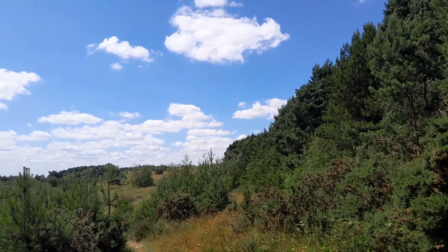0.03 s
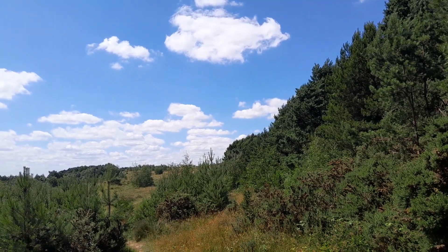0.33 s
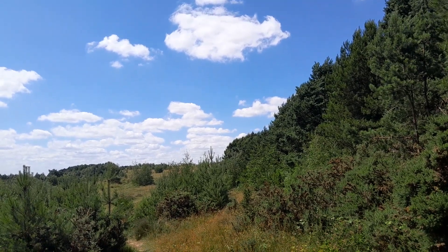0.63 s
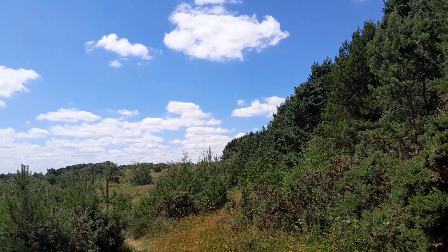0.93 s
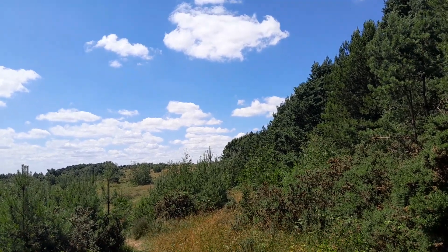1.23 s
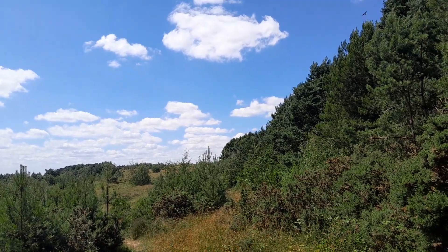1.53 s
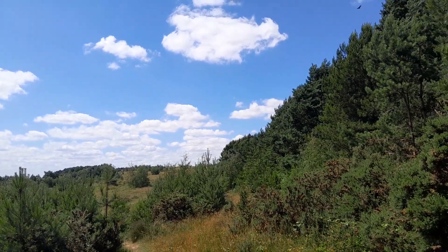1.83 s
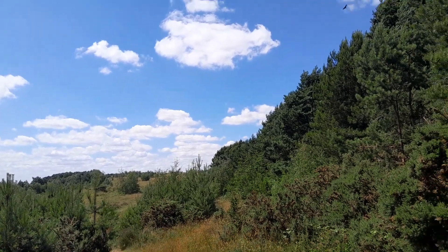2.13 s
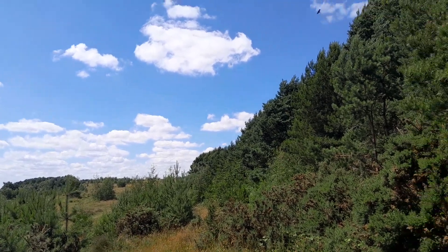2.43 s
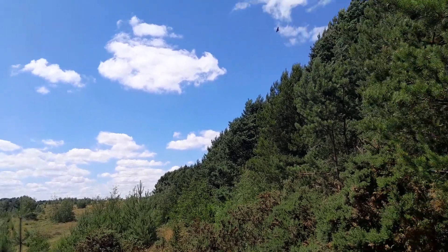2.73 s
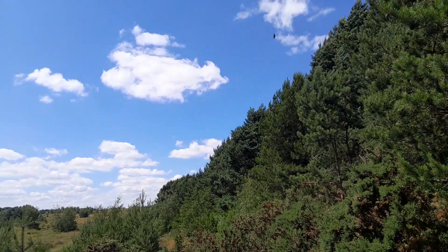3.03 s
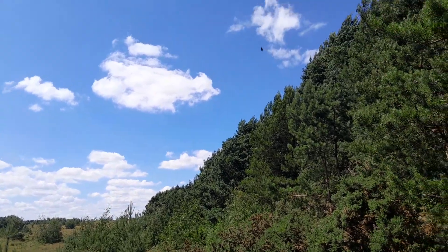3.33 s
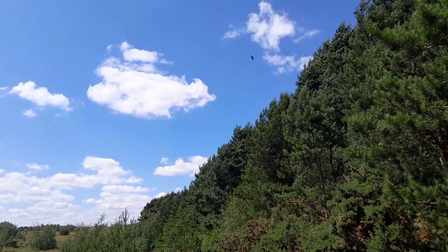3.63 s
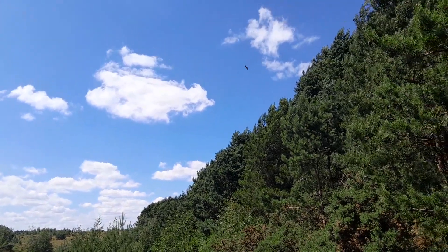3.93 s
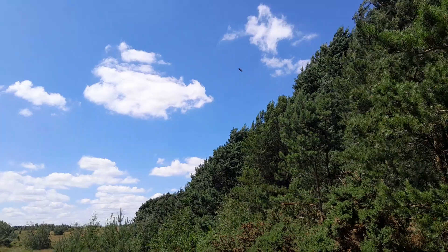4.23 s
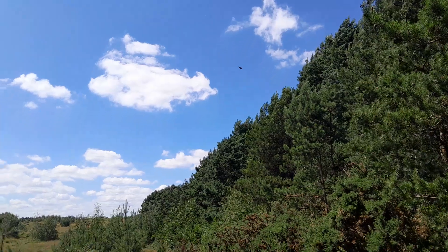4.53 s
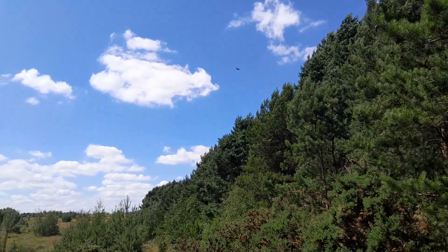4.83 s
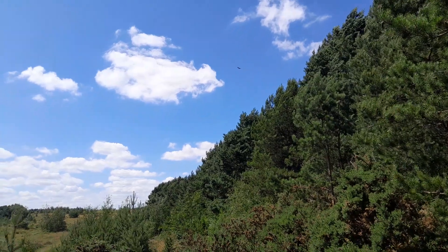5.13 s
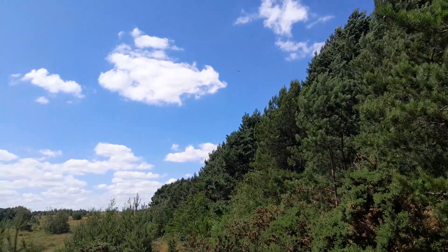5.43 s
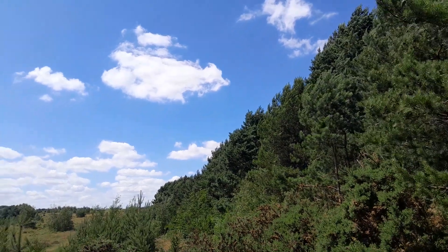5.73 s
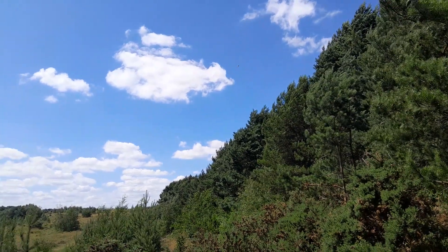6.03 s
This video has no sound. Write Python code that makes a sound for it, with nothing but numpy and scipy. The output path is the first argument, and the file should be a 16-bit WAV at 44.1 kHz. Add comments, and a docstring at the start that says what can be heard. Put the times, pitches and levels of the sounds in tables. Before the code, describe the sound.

Low, uneven wind buffeting outdoors, with faint short bird calls and a few sharp little snaps between the gusts.

```python
"""Summer heathland at the edge of a pine wood, heard from a hand-held camera with two microphone ports.
Far off, wind roars over the woods; nearer, it hisses in the needles. Grasshoppers rasp on the left,
a few small birds call, gorse pods snap open in the heat, and the wall of trees echoes birds and pods.
Right at the microphone, gusts buffet the ports: turbulence rumbles and flutters, large eddies thump,
the flow tears off the housing, and the cavity of the left port hums."""
import sys
import numpy as np
from scipy import signal
from scipy.fft import rfft, irfft, next_fast_len
from scipy.io import wavfile
from scipy.ndimage import uniform_filter1d, map_coordinates

SR = 44100
rng = np.random.default_rng(int(sys.argv[2]) if len(sys.argv) > 2 else 0)


def pcm_store(signal):
    """Save signal as 16-bit PCM."""
    levels = np.round(np.clip(np.atleast_2d(signal), -1, 1) * 32767)
    wavfile.write(sys.argv[1], SR, levels.astype(np.int16).T)


N = 272097


def amp(db):
    """Decibels to gain."""
    return 10 ** (np.asarray(db) / 20)


def unit(x):
    """Each channel at rms 1."""
    return x / np.sqrt(np.mean(x ** 2, axis=-1, keepdims=True) + 1e-20)


def along(points, hz):
    """Rows of f/Hz, value, read on a log frequency axis."""
    freqs, values = np.transpose(points)
    return np.interp(np.log(hz + 1), np.log(freqs + 1), values)


def curve(rows):
    """Rows of t/s, value, as one value per sample."""
    return np.interp(np.arange(N) / SR, *np.transpose(rows))


def wobble(rate):
    """A smooth random curve, rate knots a second."""
    knots = rng.standard_normal(int(N * rate / SR) + 4)
    return map_coordinates(knots, [np.arange(N) * rate / SR])


def filtered(x, response):
    """x through a frequency response."""
    size = next_fast_len(N + SR // 2)
    return irfft(rfft(x, size) * response(np.fft.rfftfreq(size, 1 / SR)), size)[..., :N]


def noise(spectrum):
    """Noise of rms 1, coloured by rows of f/Hz, level/dB."""
    return unit(filtered(rng.standard_normal(N), lambda hz: amp(along(spectrum, hz))))


def even(x, size):
    """x with its own swells over size samples levelled out."""
    power = uniform_filter1d(uniform_filter1d(x * x, size), size)
    return x / np.sqrt(np.abs(power) + 1e-9)


def pan(db):
    """Left and right gains for a level difference."""
    return amp([[db / 2], [-db / 2]])


def add(track, s, sound):
    """Mix a sound in at time s."""
    at = round(s * SR)
    lo, hi = max(at, 0), min(at + sound.shape[-1], N)
    track[..., lo:hi] += sound[..., lo - at:hi - at]


def roar(gain_db=7.0, lag_s=0.00039):
    """Far wind over the woods, reaching the left port first and the right one a moment later."""
    # colour of the roar: f/Hz, level/dB
    spectrum = [(40, -18), (200, -3.5), (380, -1.5), (580, -2.5), (900, 3), (1100, 1), (1500, -7),
                (1900, -16.5), (2400, -40), (4000, -28), (8000, -120)]
    # sound arriving from one direction: f/Hz, share of the power
    one_way = [(200, 0.64), (550, 0.25), (1000, 0.82), (1400, 0.56), (2200, 0.63)]
    # rise and fall of the far wind: t/s, level/dB
    swell = [(0.0, -56), (0.43, -62.5), (0.95, -63.5), (1.55, -63), (2.08, -61.5), (2.54, -58), (2.68, -65),
             (2.84, -70.5), (3.04, -64.5), (3.17, -74), (3.47, -69.5), (4.02, -67.5), (4.26, -61.5),
             (4.42, -67), (4.73, -62), (5.09, -65), (5.43, -61), (6.17, -66)]
    far, diffuse = noise(spectrum), np.array([noise(spectrum), noise(spectrum)])
    delay = lambda hz: np.exp(-2j * np.pi * np.outer([0, lag_s], hz))
    direct = filtered(far, lambda hz: np.sqrt(along(one_way, hz)) * delay(hz))
    scattered = filtered(diffuse, lambda hz: np.sqrt(1 - along(one_way, hz)))
    return amp(curve(swell) + gain_db + .9 * wobble(12)) * (direct + scattered)


def hollow_tone(peak_s=0.066, half_s=0.2, hz=860, width_hz=45, level_db=-59):
    """A faint hollow tone rings briefly in the far roar."""
    t = np.arange(N) / SR
    ring = unit(filtered(rng.standard_normal((2, N)), lambda f: np.exp(-((f - hz) / width_hz) ** 2)))
    return amp(level_db) * np.exp(-((t - peak_s) / half_s) ** 2) * ring


def tree_echo(x, build_s=0.01):
    """Trunks and needles at the wood's edge scatter sound back as a short diffuse tail."""
    # decay of the echo: f/Hz, t60/s
    decay = [(500, 0.43), (4700, 0.33), (9000, 0.26), (15000, 0.62)]
    hz, t, bands = signal.stft(rng.standard_normal((2, SR // 2)), SR, nperseg=256)
    envelope = amp(-60 * t / along(decay, hz)[:, None]) * (1 - np.exp(-t / build_s))
    tail = signal.istft(bands * envelope, SR, nperseg=256)[1]
    return signal.fftconvolve(x, tail / np.linalg.norm(tail[0]), axes=1)[:, :N]


def needles(gain_db=-4):
    """Wind hisses in the near pines; the left port hears more of the middle of the hiss."""
    # colour of the hiss: f/Hz, level/dB
    spectrum = [(800, -20), (1600, 11.5), (2100, 9), (2500, -1), (3200, -7), (4000, -7.5), (5200, -2.5),
                (6200, -3), (7400, 2.5), (8300, -2), (9300, -8.5), (10500, -5.5), (12000, -2.5),
                (15800, -6)]
    # wind in the near trees: t/s, level/dB
    swell = [(0, -66), (0.7, -71), (2.1, -67.5), (2.42, -65), (2.8, -71), (3.6, -70), (4.25, -64),
             (4.6, -66), (5.4, -62.5), (6.17, -61)]
    left_lift = [(2000, -2), (4500, 7), (8000, 7), (10000, -1), (15000, -1)]  # f/Hz, gain/dB
    left = filtered(noise(spectrum), lambda hz: amp(along(left_lift, hz)))
    return amp(curve(swell) + gain_db + .4 * wobble(15)) * np.array([left, noise(spectrum)])


def grasshoppers(gain_db=-6, fade_s=.08, low_from_s=3.366):
    """Bouts of very high rasping in the grass to the left, pulsed by uneven wing strokes."""
    # bouts of rasping: start/s, end/s, level/dB, stroke rate/Hz, stroke depth/dB
    bouts = [(-0.1, 0.913, -73, 36, -4), (0.925, 1.4, -72, 36, 0.2), (2.051, 2.532, -70, 32, 0),
             (3.366, 3.42, -76, 30, 3), (4.161, 4.43, -77, 24, 3.5), (4.762, 5.22, -77.5, 60, 6),
             (5.842, 6.13, -71, 27, 5.5)]
    # voice of the first singers: f/Hz, level/dB
    high_rasp = [(6000, -49), (10000, -15.5), (11500, -15.5), (12600, -13.5), (13300, -4.5), (14600, -3),
                 (15800, 0), (17000, -11)]
    # lower voice of the later singers: f/Hz, level/dB
    low_rasp = [(7000, -47), (10200, -27), (11300, -7.5), (12200, 3.5), (13300, -8.5), (14700, 3.5),
                (15800, -3), (17000, -22)]
    t, envelope = np.arange(N) / SR, np.zeros(N)
    drift, uneven_db = .5 * wobble(25), wobble(60)
    for start, end, db, rate, depth_db in bouts:
        gate = np.clip(np.minimum(t - start, end - t) / fade_s + .5, 0, 1)
        envelope += gate * amp(db + depth_db * np.sin(2 * np.pi * (rate * t + drift)))
    voice = np.where(t < low_from_s, noise(high_rasp), noise(low_rasp))
    return envelope * amp(gain_db + uneven_db) * voice * pan(20.5)


def branches(x, count=14, first_s=0.0038, spread_s=.02, gain_db=-12):
    """Nearby branches send each port a few close reflections that smear the sound."""
    out = x.copy()
    for port, (delay, strength) in zip([0, 1] * count, rng.random((2 * count, 2))):
        add(out[port], first_s + delay * spread_s, amp(gain_db) * (.5 + strength) * x[port])
    return out * np.sqrt(np.sum(x ** 2) / np.sum(out ** 2))


def bird_note(hz, waver_hz):
    """One note on a pitch path, swelling and fading; a fast random waver makes it buzz."""
    pitch = hz + waver_hz * wobble(500)[:len(hz)]
    envelope = np.sqrt(np.abs(np.sin(np.linspace(0, np.pi, len(hz)))))
    return envelope * np.sin(2 * np.pi * np.cumsum(pitch) / SR)


def birds(chip_start_hz=8280, chip_bend=1.9, slide_share=0.09, slide_s=.028):
    """Small birds out in the gorse: buzzy notes, falling chips and rising whistles."""
    # buzzy notes: t/s, length/s, f/Hz, fall/Hz, level/dB, waver/Hz, left-right/dB
    buzzes = [(-0.03, 0.077, 4040, 79.5, -50, 110, 4.5), (-0.03, 0.052, 5020, -5, -59, 170, 8.5),
              (0.079, 0.031, 2750, 801.5, -55.5, 220, 3.5), (0.155, .115, 2785, 123, -59.5, 260, 2.5),
              (5.554, .22, 4530, 52, -74, 379, 14.5), (5.74, .5, 4510, 52.5, -74.5, 446, 16)]
    # chips that fall fastest at first: t/s, length/s, end f/Hz, level/dB
    chips = [(0.331, 0.013, 4200, -58), (0.357, .02, 3600, -51), (2.722, .04, 5500, -73),
             (3.282, .03, 6000, -71), (3.613, 0.015, 6500, -70)]
    # thin whistles that slide up and hold: t/s, length/s, held f/Hz, level/dB, left-right/dB
    whistles = [(2.458, .2, 4810, -67, 0), (2.854, .09, 4130, -85.5, -6), (2.991, 0.15, 4675, -71, -2),
                (3.346, .1, 4060, -79.5, -4)]
    out = np.zeros((2, N))
    for s, length, hz, fall_hz, db, waver_hz, pan_db in buzzes:
        path = hz + fall_hz * np.linspace(.5, -.5, int(length * SR))
        add(out, s, amp(db) * pan(pan_db) * bird_note(path, waver_hz))
    for s, length, end_hz, db in chips:
        path = end_hz + (chip_start_hz - end_hz) * np.linspace(1, 0, int(length * SR)) ** chip_bend
        add(out, s, amp(db) * pan(6) * bird_note(path, waver_hz=350))
    for s, length, hz, db, pan_db in whistles:
        path = hz * (1 - slide_share * np.exp(-np.arange(int(length * SR)) / SR / slide_s))
        add(out, s, amp(db) * pan(pan_db) * bird_note(path, waver_hz=45))
    return out


def gorse_pods(gain_db=-5):
    """Dry pods, a little left of centre, split with a bright snap of a few milliseconds."""
    # pods splitting: t/s, level/dB, t60/s
    snaps = [(0.1424, -54, 0.0086), (0.791, -36, 0.0099), (0.886, -52.5, 0.0063), (1.548, -44.5, 0.0054),
             (1.7402, -39.5, 0.0057), (2.0257, -49.5, 0.0067), (3.6382, -53, .006)]
    # colour of a snap: f/Hz, level/dB
    spectrum = [(1000, -41), (3000, -9), (5000, -9.5), (7500, 4.5), (10000, 0.5), (12000, -0.5),
                (14500, 8.5), (16500, -11)]
    out, t = np.zeros((2, N)), np.arange(SR // 20) / SR
    colour = amp(along(spectrum, np.fft.rfftfreq(len(t), 1 / SR)))
    for s, db, t60 in snaps:
        crack = unit(irfft(rfft(rng.standard_normal((2, len(t)))) * colour, len(t)))
        add(out, s, crack * amp(db + gain_db - 60 * t / t60))
    return out * pan(2.7)


def air_flow(port, jitter_db=2, lull_below_db=-40, lull_depth=0.28):
    """Flow over one port (0 left, 1 right) in dB: a swell, more fitful when weak, with puffs on it."""
    # slow swell at the left port: t/s, level/dB
    left_swell = [(0.0, -25), (0.44, -55), (0.71, -41.5), (1.17, -69), (1.55, -63), (1.69, -40),
                  (2.22, -41), (2.39, -20), (2.66, -15), (2.71, -74), (3.3, -93), (4.26, -43), (4.54, -85),
                  (5.0, -38), (5.27, -54), (5.64, -26), (5.71, -46.5), (6.17, -34.5)]
    # slow swell at the right port: t/s, level/dB
    right_swell = [(0.0, -47), (0.14, -49), (0.89, -54.0), (1.94, -60), (2.36, -45), (2.52, -32.5),
                   (2.81, -55), (3.24, -49.5), (3.85, -38.5), (4.19, -27.0), (4.59, -49), (4.6, -30),
                   (5.11, -62.5), (5.16, -35.5), (5.49, -21), (5.71, -39), (5.92, -25.5), (6.17, -37)]
    # short puffs: t/s, half length/s, left level/dB, right level/dB
    puffs = [(0.073, 0.01, -42, -25), (0.366, 0.043, -41.5, -45), (0.721, 0.023, -34, -61.0),
             (0.76, 0.013, -54, -31.5), (1.013, 0.057, -35.0, -62), (1.269, 0.054, -50.0, -39),
             (1.384, 0.027, -34, -46), (1.458, 0.018, -50, -32.5), (1.608, 0.036, -59.0, -36),
             (1.756, 0.036, -31, -58), (1.875, 0.016, -31, -58.0), (2.016, 0.064, -31, -50),
             (2.115, 0.0092, -44, -31), (2.415, 0.021, -25, -30), (2.968, 0.072, -59, -39.5),
             (3.053, 0.044, -80, -42.0), (3.389, 0.011, -38.5, -37), (3.63, 0.061, -44.0, -41.0),
             (3.823, 0.013, -46, -39), (3.947, 0.016, -41, -49), (4.233, 0.032, -25.0, -34),
             (4.666, 0.034, -34.5, -35.5), (4.806, 0.029, -41, -33.5), (5.017, 0.043, -39, -35.5),
             (5.138, 0.019, -25.5, -24), (5.2, 0.021, -25, -23), (5.583, 0.011, -18, -24),
             (5.684, 0.013, -29, -24.5), (5.816, 0.013, -47, -34), (6.118, 0.012, -17.5, -18)]
    t, swell_db = np.arange(N) / SR, curve([left_swell, right_swell][port])
    unrest_db = jitter_db + lull_depth * np.clip(lull_below_db - swell_db, 0, 20)
    power = amp(swell_db + unrest_db * wobble(30)) ** 2
    for s, half_s, *db in puffs:
        power += amp(db[port]) ** 2 * np.exp(-2 * np.minimum(((t - s) / half_s) ** 2, 20))
    return 10 * np.log10(power)


def flutter(port):
    """Faster air sheds smaller eddies: their base level against the rumble at one port, in dB."""
    # flutter over rumble: t/s, left/dB, right/dB
    balance = [(0, -5, -12), (1, -21.5, -21), (2.1, -17.5, -4.5), (2.42, -4, -12), (2.65, 11.5, -12.5),
               (2.75, -9, -17.5), (3.6, 2, -1.5), (4.1, 3.5, 1.5), (4.65, -0.5, -4.5), (5.1, -1.5, 0),
               (5.43, 20, 1.5), (5.6, 0, 0.5), (5.9, 16.5, 13.5), (6.17, 11, 0)]
    return curve([(s, db[port]) for s, *db in balance])


def cavity_hum(flows_db, centre_hz=335, width_hz=150, follow=0.45, gain_db=-12.5):
    """Air grazing the left port sounds its broad, breathy resonance, which surges with each puff."""
    # strength of the hum: t/s, level/dB
    swell = [(0, -61), (0.6, -64), (2.2, -71), (2.6, -48), (2.71, -61.5), (3.04, -53), (3.25, -66),
             (3.55, -63.5), (4.1, -35), (4.25, -42), (4.5, -54.5), (5.05, -58), (5.35, -34), (5.55, -41),
             (5.75, -42.5), (5.95, -35), (6.17, -45)]
    resonance = lambda hz: (hz * width_hz / (centre_hz ** 2 - hz ** 2 + 1j * hz * width_hz)) ** 2
    hum = even(unit(filtered(rng.standard_normal(N), resonance)), size=1500)
    stronger_db = flows_db.max(axis=0)
    puff_db = stronger_db - uniform_filter1d(stronger_db, size=9000)
    return amp(curve(swell) + gain_db + follow * puff_db + 4.8 * wobble(25)) * hum * pan(13.4)


def tearing(flows_db, strong_gain_db=-2, weak_gain_db=-35, rough_db=4, ragged_db=5):
    """Flow tears off the housing in ragged rasps: a few strong ones, and weak ones in fast air."""
    # strong rasps at gust peaks: t/s, half length/s, level/dB, left-right/dB
    tears = [(2.549, 0.0038, -30.5, 17), (2.597, 0.017, -40, 19.5), (2.662, .004, -40, 13.5),
             (4.039, 0.0064, -38, -6), (4.116, 0.0052, -36.5, 7), (4.17, 0.0089, -42, -2),
             (4.21, 0.0045, -36.5, -10), (5.201, 0.023, -44.5, 6), (5.325, 0.0069, -37, 4),
             (5.382, 0.0048, -29.5, 10), (5.436, 0.023, -28.5, 0.5), (5.571, 0.0032, -35.5, 2),
             (5.636, 0.0046, -36, -11), (6.146, 0.044, -40.5, -1)]
    # colour of the smallest eddies: f/Hz, level/dB
    spectrum = [(150, -36), (300, -1), (480, 8.5), (660, -0.5), (850, -10.5), (1200, -22), (2000, -49),
                (4000, -120)]
    t = np.arange(N) / SR
    strong = sum(amp(db) * pan(pan_db) * np.exp(-((t - s) / half_s) ** 2)
                 for s, half_s, db, pan_db in tears)
    fast_db = np.minimum(flows_db, -24) + np.minimum([flutter(0), flutter(1)], 0)
    weak = amp(fast_db + weak_gain_db + ragged_db * np.array([wobble(90), wobble(90)]))
    rasp = np.array([even(noise(spectrum) * amp(rough_db * wobble(220)), size=500) for _ in range(2)])
    return (amp(strong_gain_db) * strong + weak) * rasp


def thumps(gain_db=-3):
    """An eddy passing the microphone makes a low thump: one swing of pressure with soft skirts."""
    # the largest eddies: t/s, left level/dB, right level/dB, f/Hz
    eddies = [(0.074, -32, -9.5, 123), (0.263, -25.5, -45, 123), (1.375, -32, -51, 104),
              (2.111, -44, -25.5, 139), (2.386, -5.5, -40, 135), (2.503, -5, -29.5, 149.5),
              (2.602, -1, -32, 146), (3.172, -66, -36.5, 215), (3.392, -38, -29.5, 125),
              (3.457, -41, -29.5, 174), (3.611, -28, -26, 166), (3.951, -32, -31, 111),
              (4.051, -26.5, -15.5, 282), (4.115, -47, -15.5, 154), (4.172, -22, -11, 224),
              (4.243, -14, -18, 138), (4.608, -25.5, -22.5, 145), (4.656, -17.5, -18, 95),
              (4.98, -28, -24, 168), (5.133, -14, -16.5, 154), (5.206, -26, -13, 166),
              (5.333, -43, -15.5, 135), (5.38, -14.5, -10, 254), (5.486, -32.5, -20, 178),
              (5.51, -15.5, -24, 159), (5.575, -9, -8.5, 122), (5.596, -12, -10.5, 122),
              (5.807, -36, -16.5, 133), (6.118, -28, -16, 128)]
    out, t = np.zeros((2, N)), np.arange(-SR // 40, SR // 40) / SR
    for s, left_db, right_db, hz in eddies:
        phase = rng.uniform(-1.05, 0.62, (2, 1))  # each port meets its own point of the swing
        envelope = np.hanning(len(t)) / (1 + (1.56 * hz * t) ** 2) ** 2
        swing = envelope * np.sin(2 * np.pi * hz * t + phase)
        gains = amp([[left_db + gain_db], [right_db + gain_db]])
        add(out, s + t[0], gains * swing / np.abs(swing).max())
    return out


def buffet(flows_db, brighten=0.079, pivot_db=-33.5):
    """Turbulence right on each port: slow rumble, and lumpy flutter that takes over as the flow grows."""
    # colour of the rumble: f/Hz, level/dB
    rumble_spectrum = [(15, -33.5), (25, -23.5), (45, 2), (65, 6.5), (120, -0.5), (170, -12), (250, -26.5),
                       (400, -36), (800, -54.5), (2000, -120)]
    # colour of the fluttering eddies: f/Hz, level/dB
    eddy_spectrum = [(25, -39.5), (70, -12.5), (130, 8), (220, -1), (320, -6), (450, -14), (620, -28),
                     (900, -43), (1500, -51.5), (2500, -81), (4000, -120)]
    out = []
    for port, flow_db in enumerate(flows_db):
        ratio = amp(flutter(port) + brighten * (flow_db - pivot_db))
        lumps = amp(5 * wobble(100))
        rumble = even(noise(rumble_spectrum), size=1100)
        eddies = even(noise(eddy_spectrum) * lumps, size=1200)
        out.append(amp(flow_db) * (rumble + ratio * eddies) / np.sqrt(1 + ratio ** 2))
    return np.array(out)


def scene():
    """Wind on the microphone, with the quiet heath behind it."""
    flows_db = np.array([air_flow(0), air_flow(1)])
    wind = buffet(flows_db) + cavity_hum(flows_db) + thumps() + tearing(flows_db)
    song, snaps = branches(birds()), gorse_pods()
    echo = tree_echo(amp(-2.5) * song + amp(-5) * snaps)
    background = roar() + hollow_tone() + needles() + grasshoppers()
    return background + echo + song + snaps + wind


def record(dry, top_hz=15800):
    """The camera keeps nothing above its band limit."""
    return filtered(dry, lambda hz: hz < top_hz)


dry = scene()
out = record(dry)
pcm_store(out)
```